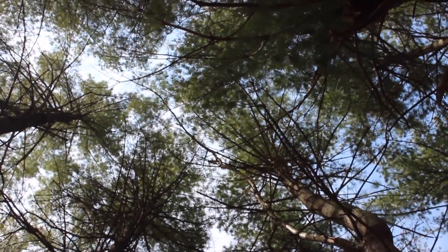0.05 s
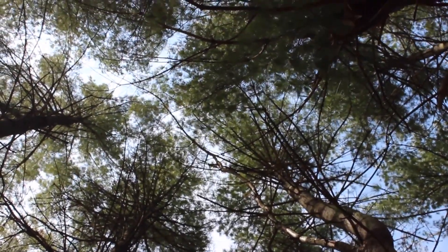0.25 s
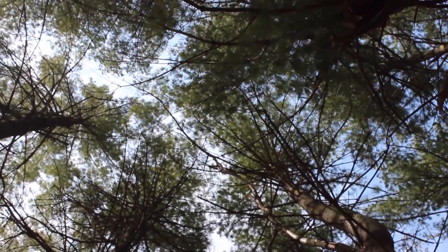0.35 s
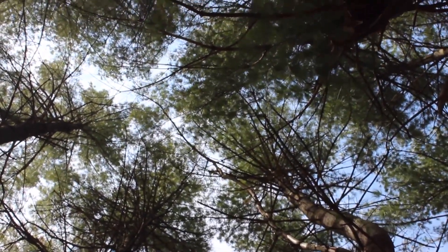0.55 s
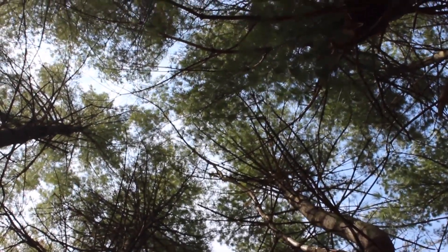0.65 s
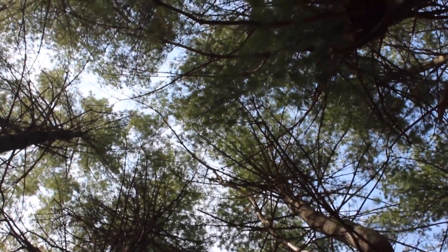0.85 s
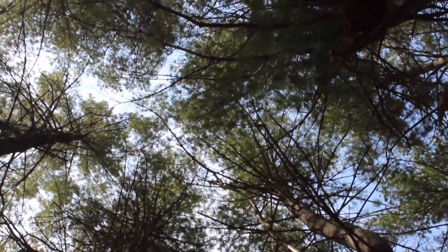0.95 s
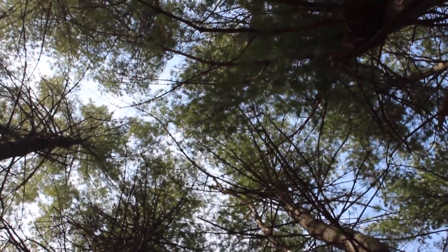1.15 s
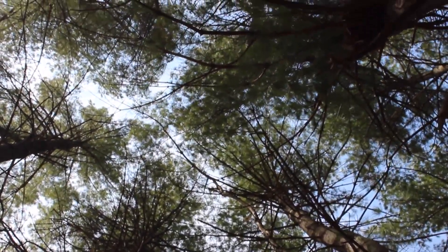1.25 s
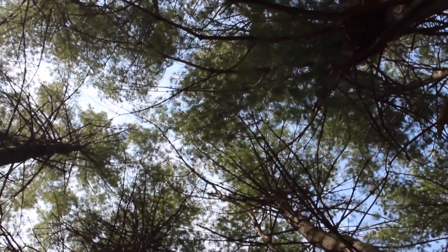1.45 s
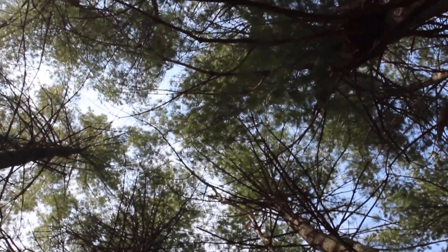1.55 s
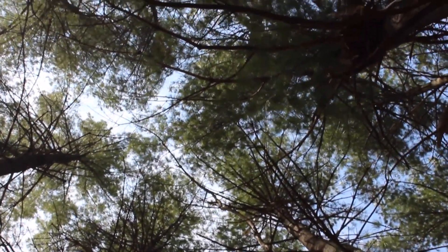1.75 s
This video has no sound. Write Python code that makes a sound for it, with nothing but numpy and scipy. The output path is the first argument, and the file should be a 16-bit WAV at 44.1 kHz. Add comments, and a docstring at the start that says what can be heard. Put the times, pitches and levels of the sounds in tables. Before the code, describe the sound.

Wind rushes steadily through tall pines overhead, a broad roar with a fine hiss of needles. A gust buffets the microphone for about a second with a low, lumpy rumble and soft thumps, then sinks to a light flutter.

```python
"""Wind rushes steadily through tall pines overhead: a broad roar of the crowns, a fine hiss of needles.
For about a second a gust reaches the ground and its eddies buffet the microphone:
a low, lumpy, centred rumble with single thumps, which then sinks to a light flutter."""
import sys
import numpy as np
from scipy import signal
from scipy.fft import rfft, irfft, next_fast_len
from scipy.io import wavfile
from scipy.ndimage import uniform_filter1d, map_coordinates

SR = 44100
rng = np.random.default_rng(int(sys.argv[2]) if len(sys.argv) > 2 else 0)


def dump(signal):
    """Clip the signal to [-1, 1] and save it as 16-bit WAV at the path in sys.argv[1]."""
    limited = np.clip(np.atleast_2d(signal).T, -1, 1)
    pcm = np.round(limited * 32767).astype(np.int16)
    wavfile.write(sys.argv[1], SR, pcm)


N = 79380


def amp(db):
    """Decibels to gain."""
    return 10 ** (np.asarray(db) / 20)


def unit(x):
    """Scale to rms 1."""
    return x / np.sqrt(np.mean(x ** 2) + 1e-20)


def along(points, hz):
    """Interpolate (freq_hz, value) points on a log frequency axis."""
    freq_hz, values = np.transpose(points)
    return np.interp(np.log(hz + 1), np.log(freq_hz + 1), values)


def curves(rows):
    """Per-sample curve for each column after time_s."""
    time_s, *columns = np.transpose(rows)
    return [np.interp(np.arange(N) / SR, time_s, column) for column in columns]


def wobble(rate_hz):
    """Smooth random curve, rate_hz knots a second."""
    return map_coordinates(rng.standard_normal(512), [np.arange(N) * rate_hz / SR], mode="wrap")


def filtered(x, response):
    """Zero-phase filter with gain response(hz)."""
    size = next_fast_len(N + SR // 2)
    return irfft(rfft(x, size) * response(np.fft.rfftfreq(size, 1 / SR)), size)[..., :N]


def rush(spectrum, correlation, patchy_db):
    """Stereo noise, rms 1, with random gain patches in time and frequency."""
    bins = signal.stft(rng.standard_normal((2, N)), nperseg=512)[2]
    patches = uniform_filter1d(rng.standard_normal(bins.shape[1:]), size=6, axis=0)
    patches = unit(uniform_filter1d(patches, size=18, axis=1))
    noise = signal.istft(bins * amp(patchy_db * patches), nperseg=512)[1][:, :N]

    def mid_side_gains(hz):
        width_rad = np.arccos(np.clip(along(correlation, hz), -1, 1)) / 2
        return amp(along(spectrum, hz)) * [np.cos(width_rad), np.sin(width_rad)]

    mid, side = filtered(noise, mid_side_gains)
    return unit(np.array([mid + side, mid - side]))


def canopy():
    """Boughs roar and needles hiss, swelling slightly with the wind aloft."""
    # wind in the crowns: time_s, roar_db, hiss_db (before trim)
    wind_aloft = [(0, -52.5, -57.5), (.3, -51.2, -57.8), (.55, -50, -56.5), (.8, -50.5, -57),
                  (1.05, -51, -56), (1.35, -51, -58), (1.65, -52, -58), (1.8, -50.5, -57.5)]
    # bough and needle spectra: freq_hz, relative_db
    roar_spectrum = [(30, -52), (100, -23.5), (200, 0), (400, -0.5), (550, 0), (850, 1), (1100, -1),
                     (1500, -5), (2100, -9), (3000, -15), (5000, -19.5), (12000, -64)]
    hiss_spectrum = [(200, -17), (1000, -6), (2500, 0), (4000, 0), (6300, -0.5), (9000, -3), (12000, -5.5),
                     (15500, -9)]
    # left-right likeness: freq_hz, correlation
    roar_correlation = [(100, 1), (300, 0.86), (800, .92), (1300, 0.88), (2000, 0.7), (3500, 0.87)]
    hiss_correlation = [(1000, 0.33), (2500, -0.014), (4200, -0.32), (6500, -0.073), (10000, -0.019),
                        (15000, -0.066)]
    roar_trim_db, hiss_trim_db = 1.5, 4.5
    roar_db, hiss_db = curves(wind_aloft)
    roar_gain = amp(roar_db + roar_trim_db + 0.4 * wobble(rate_hz=8.4))
    roar = roar_gain * rush(roar_spectrum, roar_correlation, patchy_db=1.0)
    hiss_gain = amp(hiss_db + hiss_trim_db + 0.18 * wobble(rate_hz=12.7))
    hiss = hiss_gain * rush(hiss_spectrum, hiss_correlation, patchy_db=0.97)
    return roar + hiss


def eddies(spectrum, evenness):
    """Irregular pressure swings, rms 1; evenness 0-1 makes their sizes alike."""
    swings = unit(filtered(rng.standard_normal(N), lambda hz: amp(along(spectrum, hz))))
    power = uniform_filter1d(np.abs(signal.hilbert(swings)) ** 2, size=700)
    return unit(swings / (np.abs(power) + 0.01) ** (evenness / 2))


def buffeting():
    """Turbulence rumbles on the microphone; small eddies gain faster than large as the gust grows."""
    # wind pressure on the microphone: time_s, level_db (before trim)
    gust = [(0, -57.5), (.19, -54), (.215, -40.5), (.27, -45.5), (.32, -37.5), (.42, -42.5), (.46, -37),
            (.52, -35.5), (.59, -42.5), (.67, -46), (.77, -39.5), (.88, -44), (.98, -38), (1.01, -48.5),
            (1.11, -38.5), (1.18, -51), (1.39, -48), (1.435, -55), (1.52, -49), (1.69, -57), (1.74, -44),
            (1.8, -57)]
    # large and small eddy spectra: freq_hz, relative_db
    large_spectrum = [(20, -34), (40, -26), (62, -20.5), (80, -7), (100, -1), (125, -2.5), (185, -4.5),
                      (250, -15.5), (320, -21.5), (500, -52), (1000, -110)]
    small_spectrum = [(60, -34), (130, 6.5), (200, -1), (260, -4.5), (330, -15), (480, -23), (1000, -78)]
    large_trim_db, small_trim_db = -1, -3
    strong_gust_db, small_db_per_db = -34, 1.6
    gust_db, = curves(gust)
    large = amp(gust_db + large_trim_db) * eddies(large_spectrum, evenness=0.9)
    small_db = strong_gust_db + small_db_per_db * (gust_db - strong_gust_db) + small_trim_db
    small = amp(small_db) * eddies(small_spectrum, evenness=0.81)
    return large + small


def thumps():
    """Single eddies swell and pass within a few pressure swings, over a weak one-way push."""
    # eddies hitting the microphone: centre_s, peak_db (before trim), pitch_hz (before scatter), sigma_s
    hits = [(.224, -31, 108, 0.012), (.381, -23.5, 109.7, 0.011), (.457, -29, 228, 0.0031),
            (.486, -31, 96, 0.0056), (.510, -25.5, 160, 0.004), (.561, -19.5, 136.6, 0.0039),
            (.701, -29, 99, 0.0067), (.752, -32.5, 99, 0.027), (.853, -30, 127, 0.0062),
            (.908, -26, 191, 0.0036), (.950, -26.5, 94.4, 0.013), (.967, -26.5, 130, .004),
            (1.046, -33.5, 141, 0.0048), (1.138, -30, 99, 0.003)]
    trim_db, push_db, pitch_scatter = -0.5, -29, 0.034
    t, out = np.arange(N) / SR, np.zeros(N)
    for centre_s, peak_db, pitch_hz, sigma_s in hits:
        half_turns, detune = rng.uniform(-0.86, 1, 2)
        swing_hz = pitch_hz * (1 + pitch_scatter * detune)
        swing = np.sin(2 * np.pi * swing_hz * (t - centre_s) + np.pi * half_turns)
        envelope = np.exp(-0.5 * ((t - centre_s) / sigma_s) ** 2)
        out += amp(peak_db + trim_db) * envelope * (swing + amp(push_db))
    return out


def scene():
    """Wide trees above; buffeting and thumps centred."""
    return canopy() + buffeting() + thumps()


def record(dry):
    """Brick-wall low-pass."""
    cutoff_hz = 15800
    return filtered(dry, lambda hz: hz < cutoff_hz)


dry = scene()
out = record(dry)
dump(out)
```